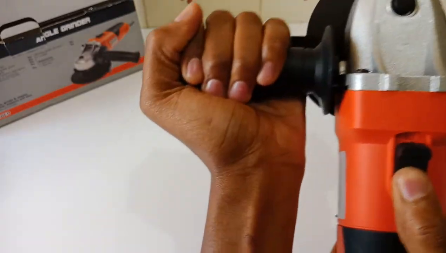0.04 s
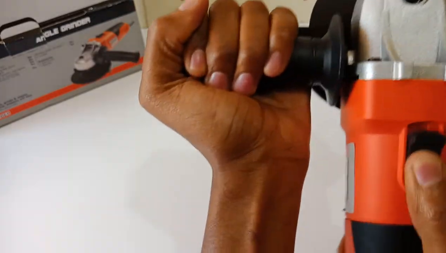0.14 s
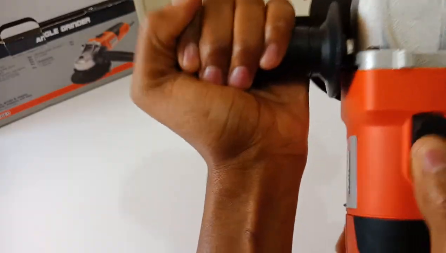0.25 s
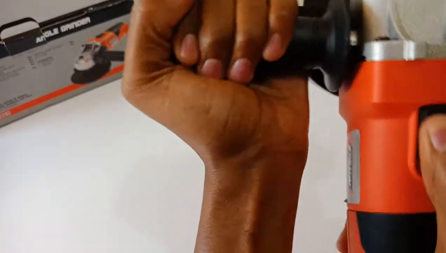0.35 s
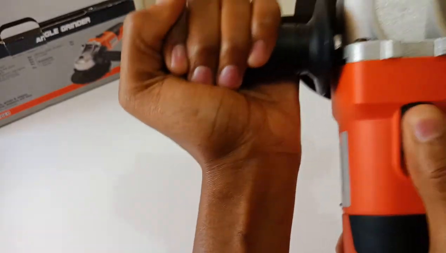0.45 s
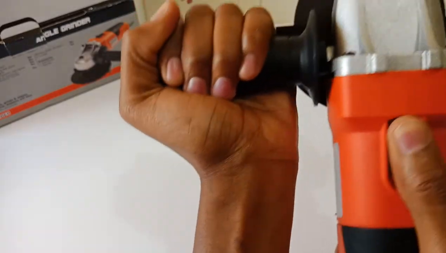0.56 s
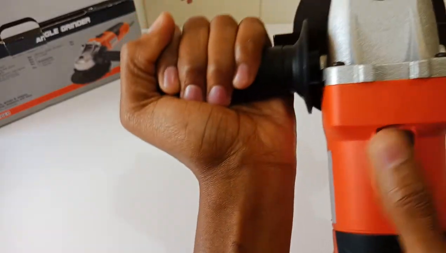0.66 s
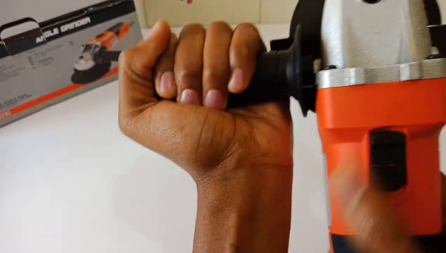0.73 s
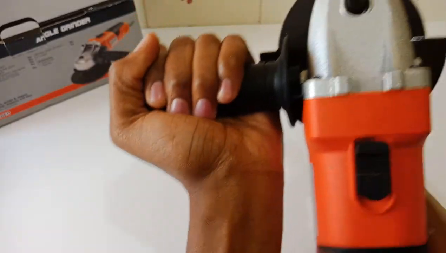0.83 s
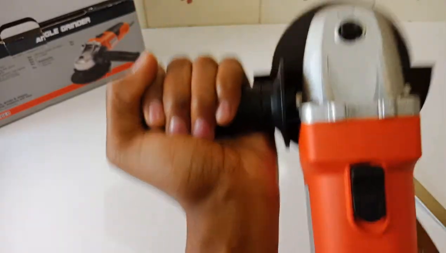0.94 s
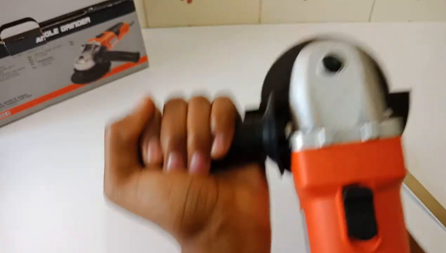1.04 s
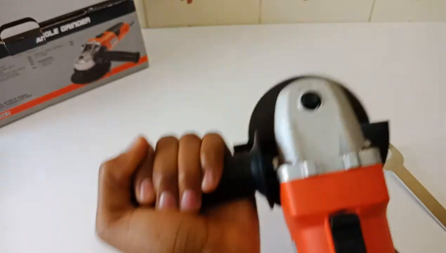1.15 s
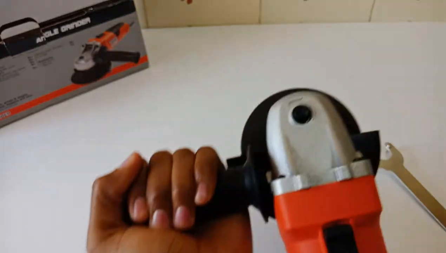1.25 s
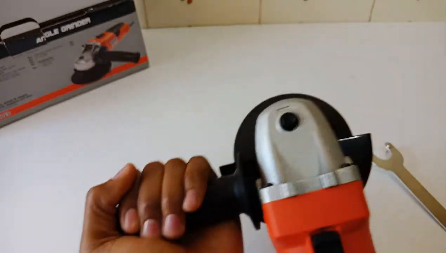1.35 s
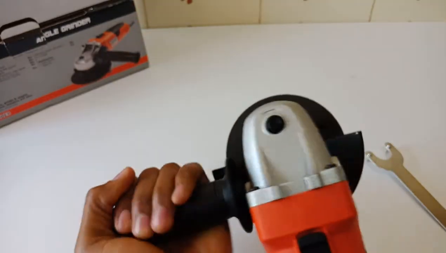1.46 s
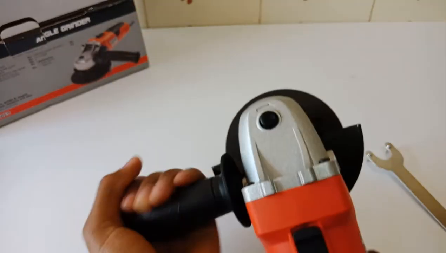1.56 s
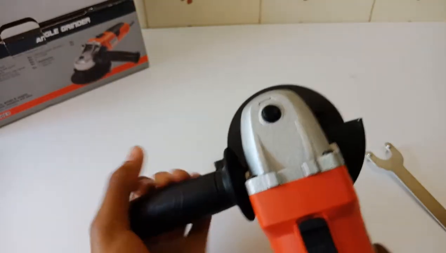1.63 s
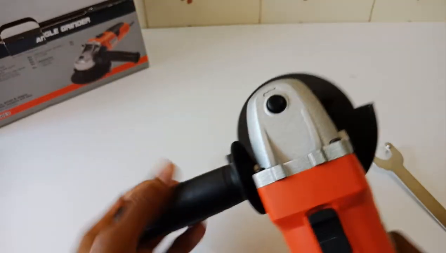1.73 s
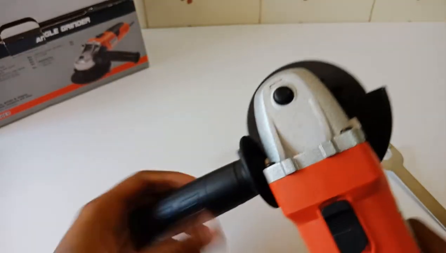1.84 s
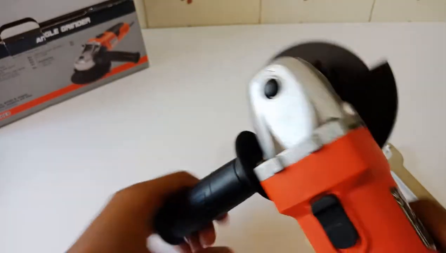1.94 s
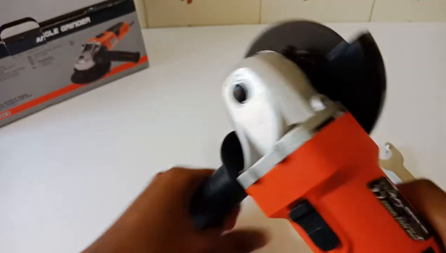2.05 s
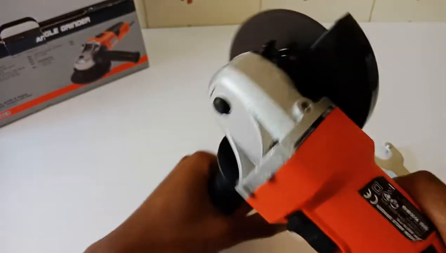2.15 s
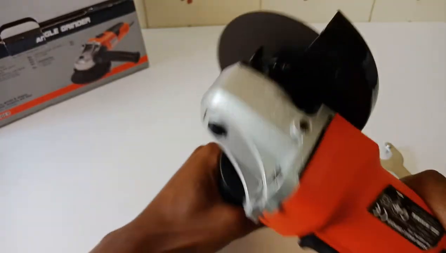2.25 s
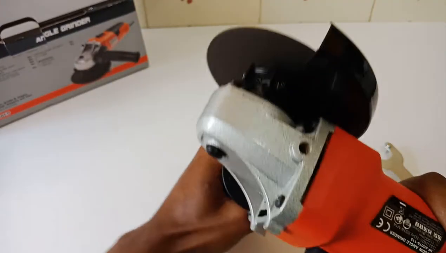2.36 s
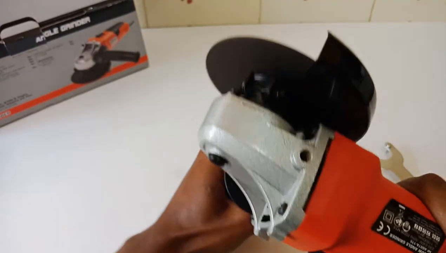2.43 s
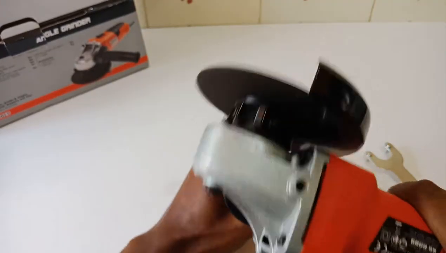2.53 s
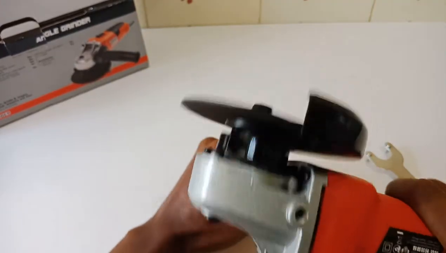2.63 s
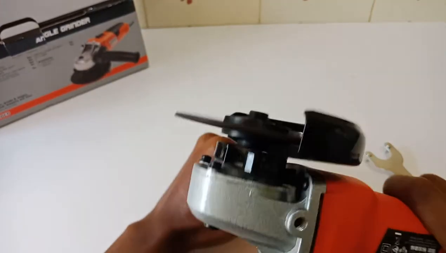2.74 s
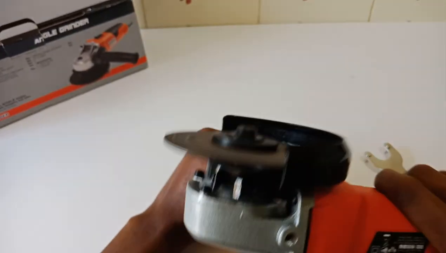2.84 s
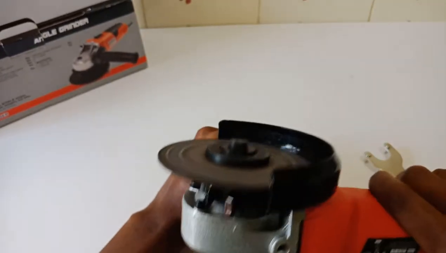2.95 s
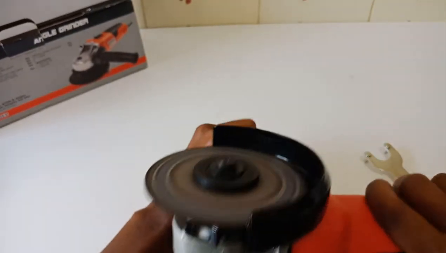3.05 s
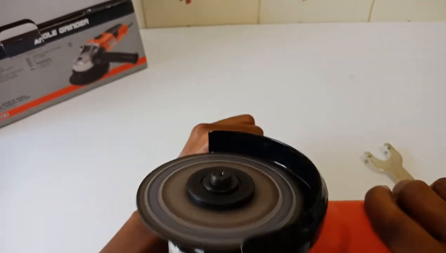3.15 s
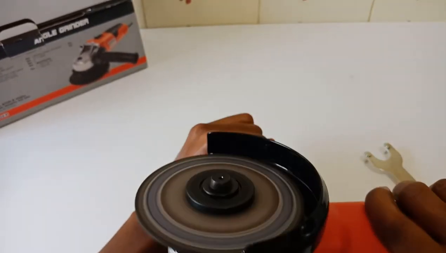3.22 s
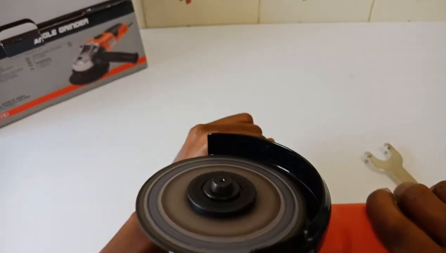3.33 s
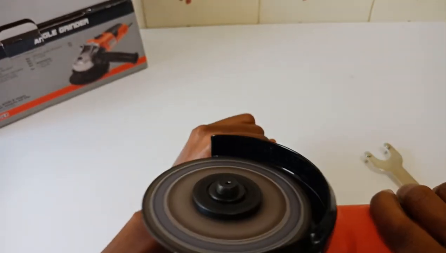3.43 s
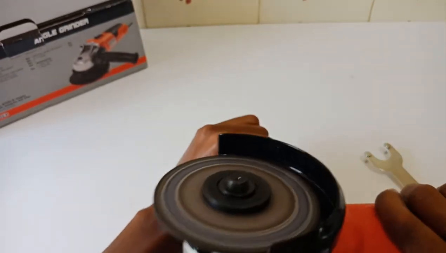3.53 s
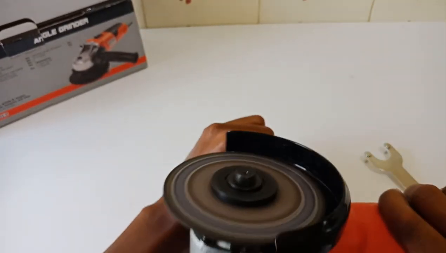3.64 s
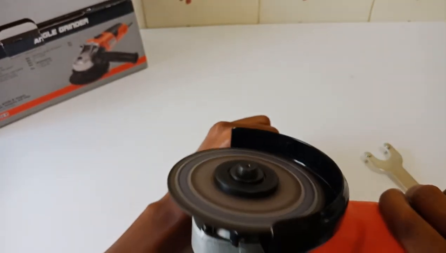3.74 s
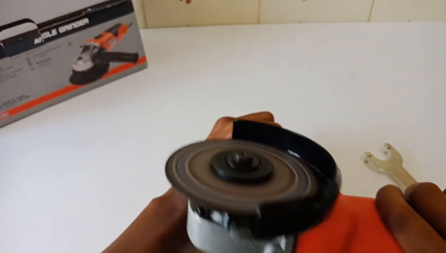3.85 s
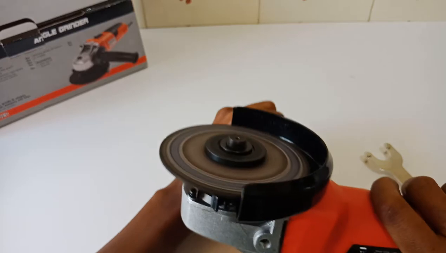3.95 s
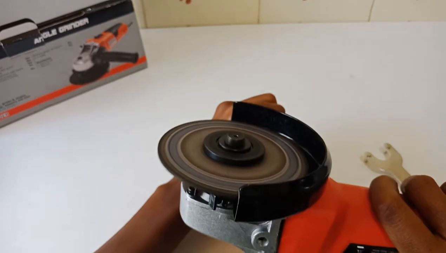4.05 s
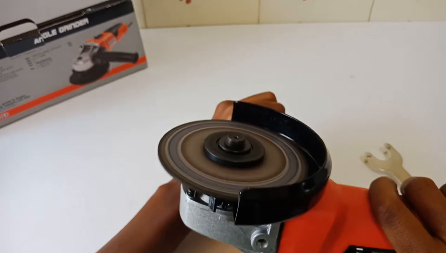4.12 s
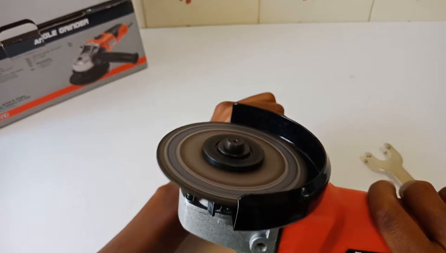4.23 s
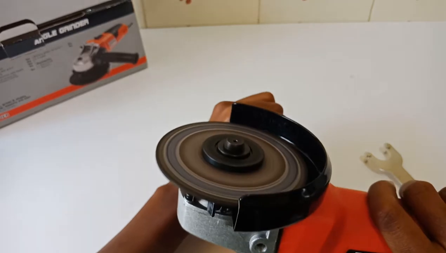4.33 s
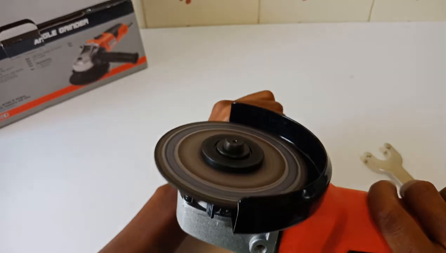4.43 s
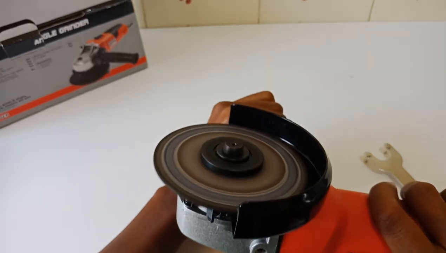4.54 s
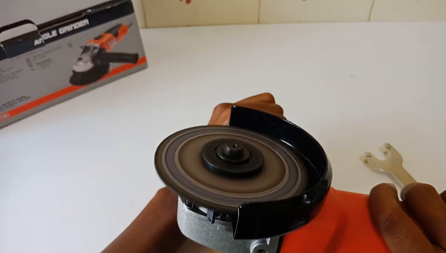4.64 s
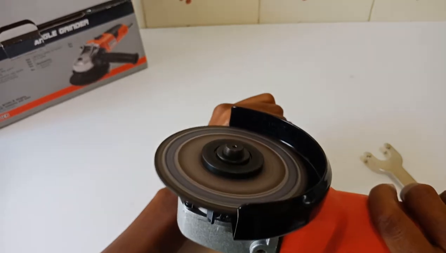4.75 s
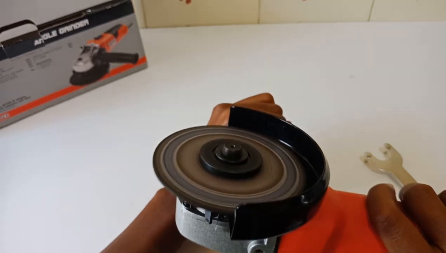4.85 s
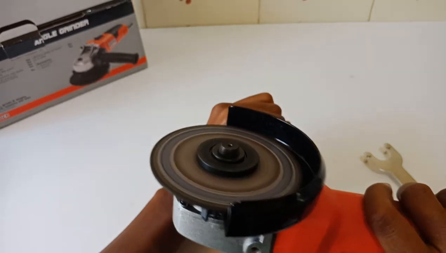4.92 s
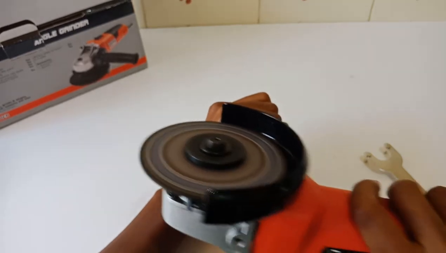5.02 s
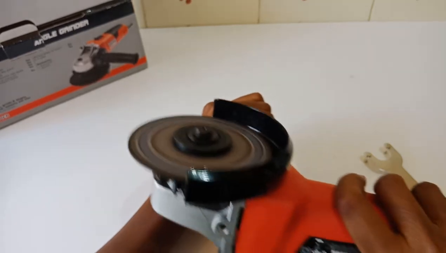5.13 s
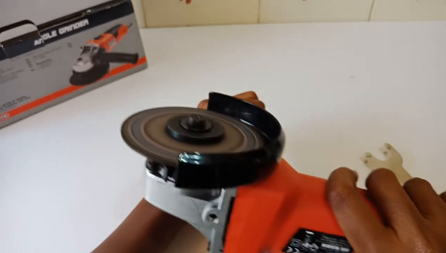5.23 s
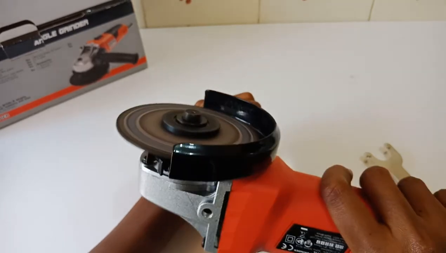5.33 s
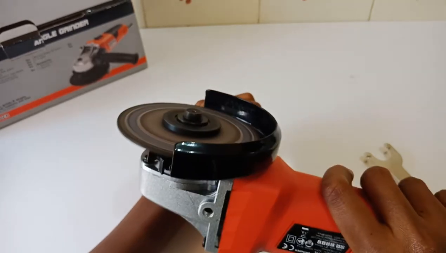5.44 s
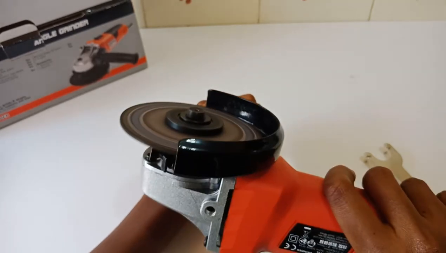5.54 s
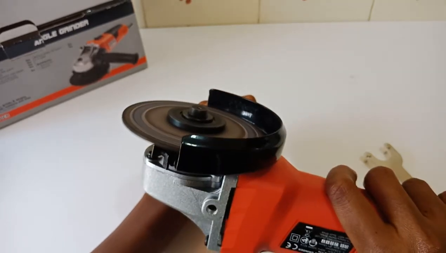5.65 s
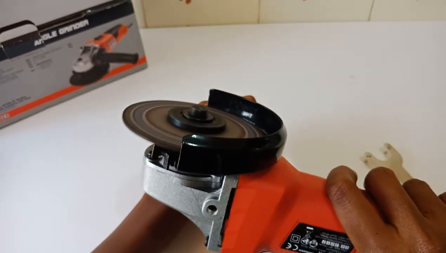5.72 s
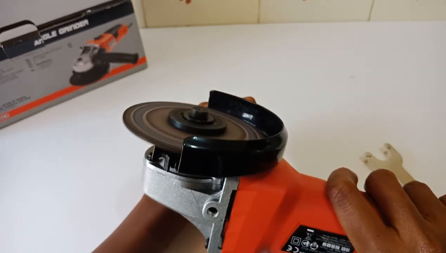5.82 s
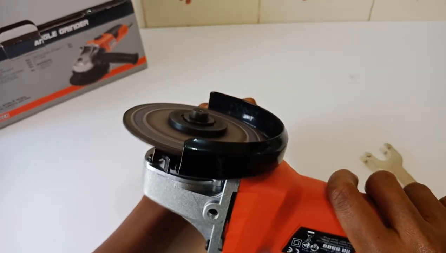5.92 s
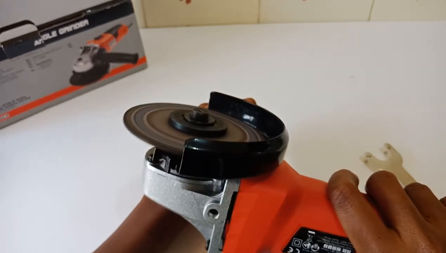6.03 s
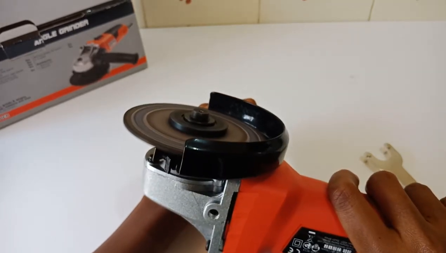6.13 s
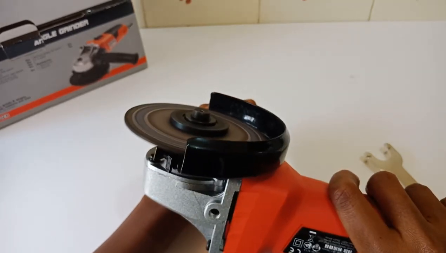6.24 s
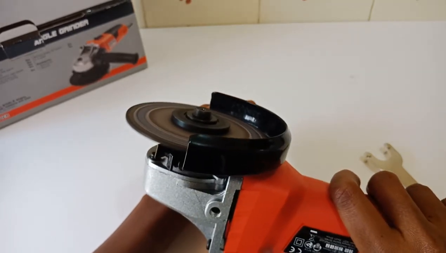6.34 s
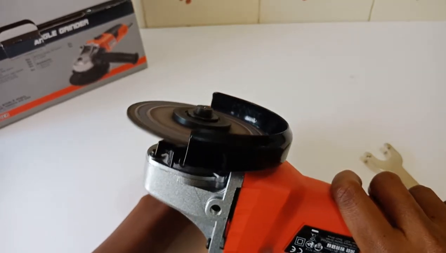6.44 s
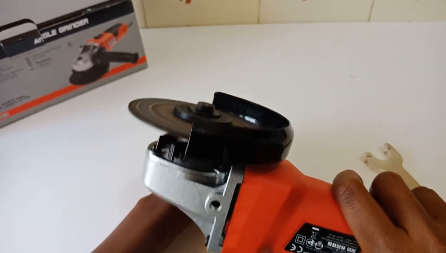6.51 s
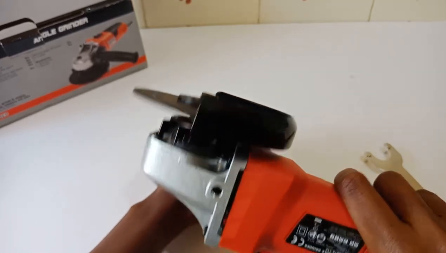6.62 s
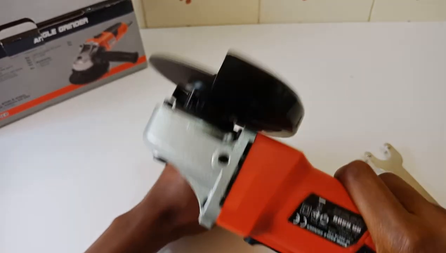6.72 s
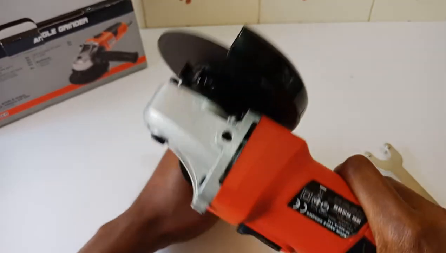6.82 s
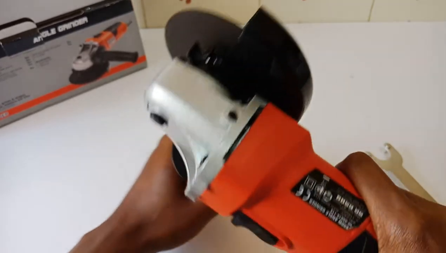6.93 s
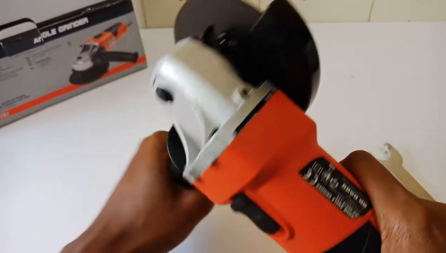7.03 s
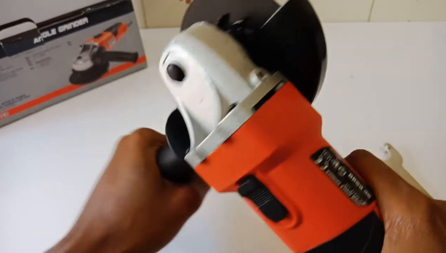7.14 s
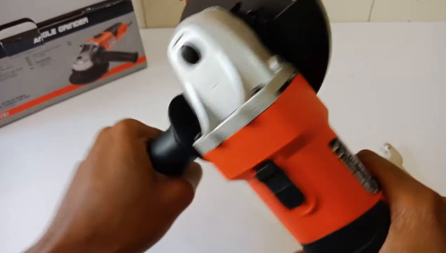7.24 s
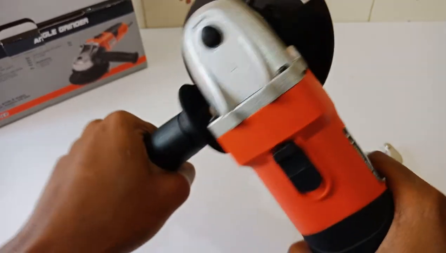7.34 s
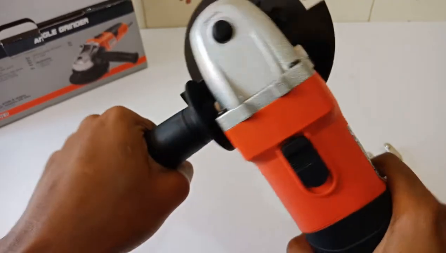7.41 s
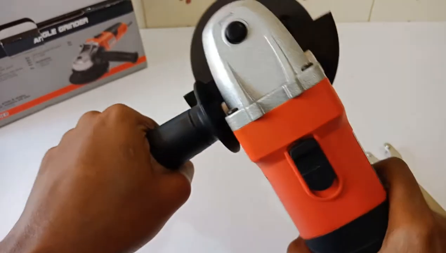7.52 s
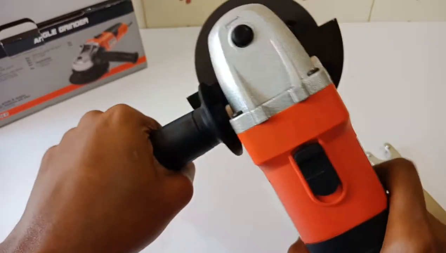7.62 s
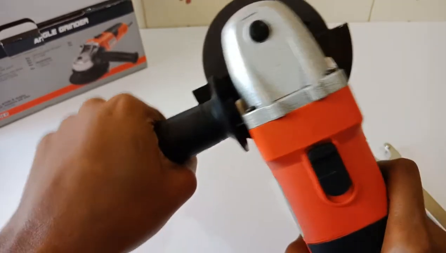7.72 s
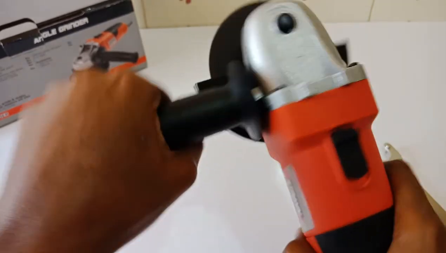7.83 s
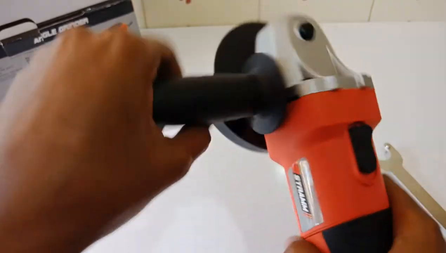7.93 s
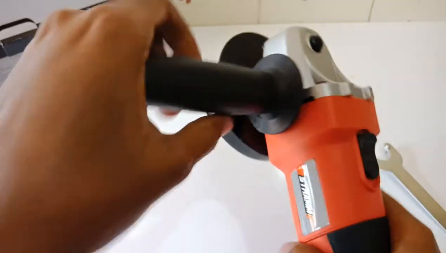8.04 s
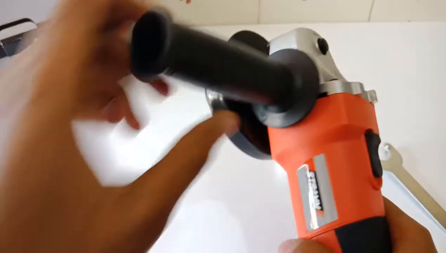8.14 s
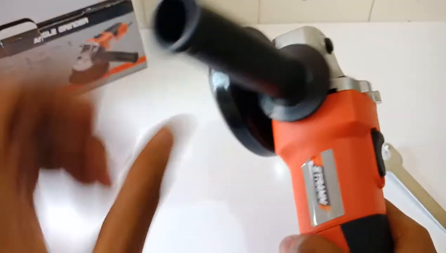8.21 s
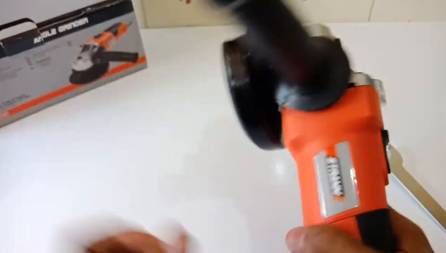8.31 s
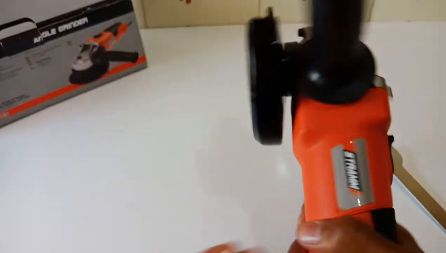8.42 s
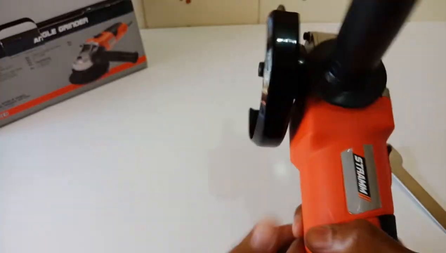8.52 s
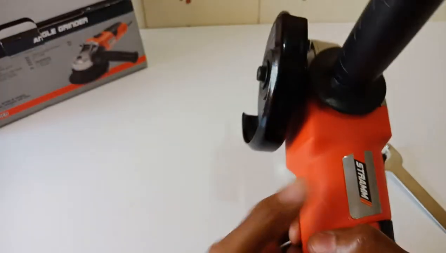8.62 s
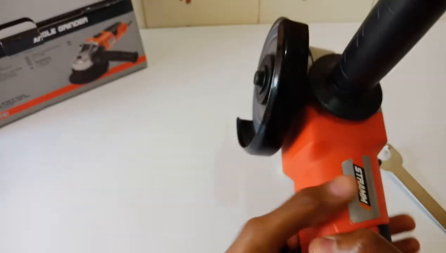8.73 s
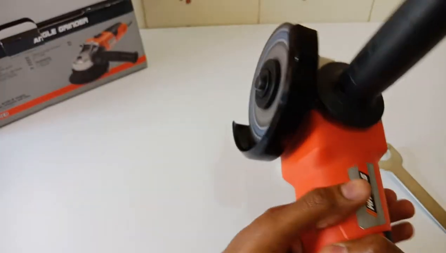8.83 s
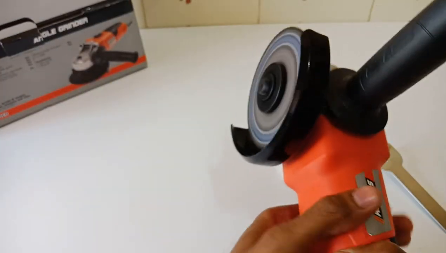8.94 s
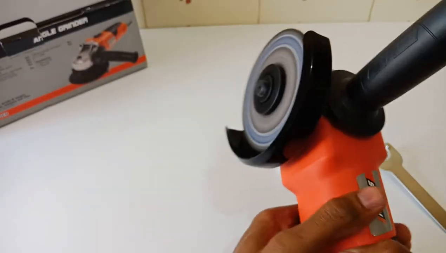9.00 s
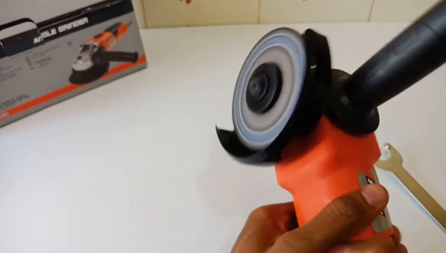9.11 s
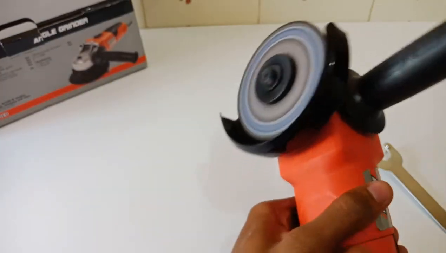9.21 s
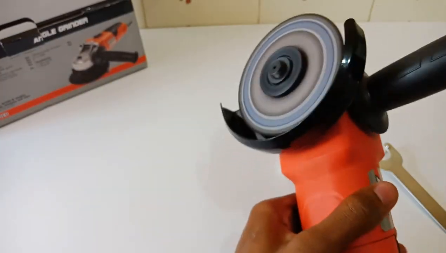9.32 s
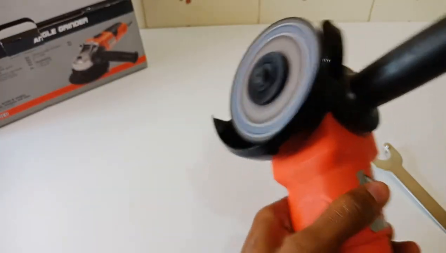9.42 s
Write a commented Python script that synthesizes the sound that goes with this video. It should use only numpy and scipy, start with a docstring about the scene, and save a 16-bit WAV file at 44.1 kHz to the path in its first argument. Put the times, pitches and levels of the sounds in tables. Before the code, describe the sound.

In a small quiet room, an angle grinder is switched on very close to the microphone. A sharp snap, a dull thud and a burst of metallic gear chatter lead into a rapid run-up. Within a second it settles into a steady, bright airy rush with a low hum and fine high whistle, its colour shifting as it is turned. It runs freely to the end.

```python
"""A small angle grinder is switched on close by and runs up to speed with no load, in a small room.
The switch snaps and the gears chatter and rasp: ringing blows, and noise pulsing at twice the mains rate.
Then air and brushes rush through the housing (shaped noise) under the rotor's hum and the commutator's
whistle (tones that follow the rotor). Turned in the hands, the tool shows its switch side, its disc and
its flank, which recolours the noise; puffs of its draught briefly buffet the microphone."""
import sys
import numpy as np
from scipy import signal
from scipy.fft import rfft, irfft, next_fast_len
from scipy.io import wavfile
from scipy.ndimage import uniform_filter1d, minimum_filter1d, map_coordinates

SR = 44100
rng = np.random.default_rng(int(sys.argv[2]) if len(sys.argv) > 2 else 0)


def dump_mix(stems):
    """Bounce the given channels to the path in sys.argv[1] as a 16-bit WAV at rate SR."""
    frames = np.atleast_2d(stems).T  # one column per channel
    limited = np.clip(frames, -1, 1)  # hard clip at full scale
    pcm = np.round(limited * 32767).astype(np.int16)
    wavfile.write(sys.argv[1], SR, pcm)


N = 417627
MAINS_THROB_HZ = 100  # twice the mains rate
SWITCH_ON_S = 0.2252

# the side that faces the microphone: (t/s, name of the side)
TURNS = [(.5, "gearhead"), (1.2, "vents"), (1.75, "vents"), (2.25, "tilted"), (2.5, "tilted"),
         (2.85, "disc"), (5.0, "disc"), (5.3, "guard"), (6.62, "guard"), (6.85, "shoulder"),
         (7.13, "shoulder"), (7.48, "switch"), (7.86, "switch"), (8.1, "flank"), (8.42, "flank"),
         (8.65, "rim"), (8.8, "rim"), (9.05, "flank")]


def amp(db):
    """Decibels to gain."""
    return 10 ** (np.asarray(db) / 20)


def unit(x):
    """Scaled to rms 1."""
    return x / np.sqrt(np.mean(x ** 2) + 1e-20)


def along(points, hz):
    """Reads (f/Hz, value) points on a log frequency axis."""
    f, v = np.transpose(points)
    return np.interp(np.log(hz + 1), np.log(f + 1), v)


def peak(hz, centre, width, height):
    """The bell shape of one resonance; width is where it has half its height."""
    return height / (1 + (2 * (hz - centre) / width) ** 2)


def curve(rows, axis=1):
    """One value per sample from a column of (t/s, value, ..) rows."""
    columns = np.transpose(rows)
    return np.interp(np.arange(N) / SR, columns[0], columns[axis])


def since_switch_on():
    """Seconds since the switch closed, 0 before that."""
    return np.maximum(np.arange(N) / SR - SWITCH_ON_S, 0)


def wobble(rate):
    """A smooth random curve through a given number of random points a second."""
    knots = rng.standard_normal(int(N * rate / SR) + 4)
    return map_coordinates(knots, [np.arange(N) * rate / SR])


def filtered(x, response):
    """x with each frequency multiplied by response(hz)."""
    size = next_fast_len(N + 8192)
    return irfft(rfft(x, size) * response(np.fft.rfftfreq(size, 1 / SR)), size)[..., :N]


def coloured(x, points):
    """x filtered to a colour given as (f/Hz, level/dB) points."""
    return filtered(x, lambda hz: amp(along(points, hz)))


def stereo_noise():
    """Two unrelated white noises."""
    return rng.standard_normal((2, N))


def spread(pair):
    """Unrelated noises become left and right, whose likeness changes with pitch and fades in the treble."""
    # likeness of left and right: (f/Hz, correlation 0-1)
    likeness = [(40, .35), (150, 0.17), (450, 0.59), (900, 0.71), (1700, 0.65), (2400, 0.45), (3300, 0.2),
                (5500, 0.18), (12000, .05)]
    # left minus right: (f/Hz, level/dB)
    balance = [(60, 0), (130, -3), (350, 1), (700, -1), (2000, 0), (4400, -2), (8000, -2), (14000, -2.5)]

    def mid_side_gains(hz):
        angle = np.arccos(np.clip(along(likeness, hz), -1, 1)) / 2
        return np.array([np.cos(angle), np.sin(angle)])

    mid, side = filtered(pair, mid_side_gains)
    left_right = np.array([mid + side, mid - side])
    return filtered(left_right, lambda hz: amp(np.outer([0.5, -0.5], along(balance, hz))))


def patchy(pair, depth_db, width_hz, life):
    """Lays a random, slowly changing pattern of narrow peaks and dips on a noise, for a grainier hiss."""
    size = 2048
    z = signal.stft(pair, nperseg=size)[2]
    bins = np.arange(z.shape[1]) * SR / size / width_hz
    frames = np.arange(z.shape[2]) * (size // 2) / SR / life  # life in s
    grid = np.meshgrid(bins, frames, indexing="ij")
    knots = rng.standard_normal((3, 700, 80))
    shared, left, right = [map_coordinates(k, grid, order=1, mode="mirror") for k in knots]
    pattern = unit(shared + np.array([left, right]))
    return signal.istft(z * amp(depth_db * pattern), nperseg=size)[1][:, :N]


def partial(turns, flutter_db, drift):
    """A stereo tone of rms 1 whose strength and phase wander at each microphone port."""
    phase = 2 * np.pi * (turns + rng.random())
    ports = []
    for port in range(2):
        strength = amp(flutter_db * wobble(14))
        ports.append(strength * np.sin(phase + drift * wobble(3)))  # drift in radians
    return unit(np.array(ports))


def facing(side):
    """How much of one side of the tool is turned to the microphone, 0-1."""
    return curve([(s, float(name == side)) for s, name in TURNS])


def radiated(part):
    """Relative level of one part in dB, as the tool turns from side to side."""
    # the parts, in the order of the level columns below
    part_names = ("hum", "sixth", "second", "fourth", "fifth", "breeze")
    # what each side sends out, relative: side: (rotor hum level/dB, rotor's sixth level/dB,
    # spindle's second level/dB, fourth level/dB, fifth level/dB, breeze level/dB)
    side_levels = { "gearhead": (-30.5, -42, -53, -58, -50, -66),
                   "vents": (-36.5, -33, -49.5, -50.5, -49, -62),
                   "tilted": (-40.5, -37, -62, -45.5, -47, -56),
                   "disc": (-37.5, -35, -54.5, -51, -44.5, -54),
                   "guard": (-42.5, -31.5, -59, -48, -55, -60),
                   "shoulder": (-45, -41, -60, -36.5, -53, -60), "switch": (-29.5, -43, -62, -41, -43, -61),
                   "rim": (-42.5, -34, -60, -47, -46, -62), "flank": (-37, -43, -56, -44.5, -43, -63)}
    column = part_names.index(part)
    return curve([(s, side_levels[side][column]) for s, side in TURNS])


def still_room(level_db=-53.5):
    """Faint steady background of the room: shaped noise at a constant level."""
    # colour of the still room: (f/Hz, relative level/dB per Hz)
    room_colour = [(18, -50), (30, -34), (76, 9), (301, -4.5), (350, -2.5), (863, -13), (3020, -12.5),
                   (12000, -53), (15600, -84), (22000, -120)]
    return amp(level_db) * unit(coloured(spread(stereo_noise()), room_colour))


def clacks(ring_db=-19, crack_db=-5.0, crack_t60=0.024, room_db=-12, room_t60=0.56):
    """Each blow cracks (a noise burst) and rings the gear case (fading tones); the small room answers."""
    # the switch, then gear teeth slamming through their backlash: (t/s, relative level/dB)
    blows = [(0.2144, -27), (0.2255, -7), (.2282, 2), (.2405, -5.5), (.2485, -6), (.2575, -6), (.2685, -7),
             (.2895, -10), (0.309, -11), (.3465, -11), (.358, -15), (.3695, -14), (.4175, -15), (.469, -11),
             (.5205, -11)]
    # ringing tones of the gear case: (f/Hz, relative level/dB, time to fall by 60 dB/s)
    case_tones = [(707, -5, .08), (817, -1.5, 0.2), (1680, -3, .04), (3700, 7, .07), (3800, 0, .07),
                  (4120, -1, .06), (4560, 0, .05), (5540, -4, 0.055)]
    crack_colour = [(40, -18), (150, -11), (500, -1.0), (750, -15), (1500, 2.0), (2500, -4),
                    (4000, 15.0), (6000, 1), (8500, -23), (15000, -36)]  # (f/Hz, level/dB)
    t = np.arange(SR // 4) / SR
    rings, cracks = np.zeros((2, 2, N))
    attack = 1 - np.exp(-(t / 0.00041) ** 2)
    for s, db in blows:
        start = round(s * SR)
        span = slice(start, start + len(t))
        for hz, level, t60 in case_tones:
            phase = rng.uniform(0, 2 * np.pi, (2, 1))
            uneven_db = rng.normal(0, 2.3)  # no two blows ring alike
            envelope = attack * amp(db + level + uneven_db - 60 * t / t60)
            rings[:, span] += envelope * np.sin(2 * np.pi * hz * t + phase)
        cracks[:, span] += amp(db - 60 * t / crack_t60) * rng.standard_normal((2, len(t)))
    direct = amp(ring_db) * rings + amp(crack_db) * spread(coloured(cracks, crack_colour))
    tail = rng.standard_normal((2, len(t))) * amp(-60 * t / room_t60)
    tail /= np.linalg.norm(tail[0])
    return direct + amp(room_db) * signal.fftconvolve(direct, tail, axes=1)[:, :N]


def rotor_speed(unsteady=0.000438):
    """Turns per second: a surge at switch-on, then a slower creep up to the free-running speed."""
    # the free-running speed drifts a little: (t/s, rotor turns per second/Hz)
    free_speed = [(.8, 483), (1.1, 480), (1.6, 481.5), (1.95, 480), (2.25, 484.5), (2.65, 487.5),
                  (3.1, 486), (3.5, 482.3), (3.85, 481), (4.38, 484.8), (4.7, 481.6), (5.1, 484.8),
                  (5.45, 485.6), (5.8, 489), (6.15, 484.3), (6.45, 486.3), (6.7, 486.3), (7.05, 491.5),
                  (7.6, 494.3), (8.4, 493.3), (9.3, 492.6)]
    surge_s, creep_s = 0.0896, 0.308  # time constants
    surge_share = 0.538
    t = since_switch_on()
    lag = surge_share * np.exp(-t / surge_s) + (1 - surge_share) * np.exp(-t / creep_s)
    return curve(free_speed) * (1 - lag) * (1 + unsteady * wobble(12))


def kick(db=-22, hz=170, t60=0.027):
    """The starting torque jerks the tool in the hands: one dull thud, a fast-fading low tone."""
    t = since_switch_on()
    thud = amp(db - 60 * t / t60) * np.sin(2 * np.pi * hz * t)
    return thud * amp([[1], [-1]])  # the left port is slightly louder, in dB


def judder(db=-13.5, fade_db_per_s=90, depth=0.45, first_peak_s=0.0043):
    """The starting current drives the gears in pulses at twice the mains rate; the rasp then fades."""
    # colour of the gears grinding under the starting torque: (f/Hz, relative level/dB per Hz)
    rasp_colour = [(100, -36), (550, -25), (790, -9.5), (1000, -31), (1650, -13), (3100, -17), (3500, -7),
                   (3720, -0.5), (3950, -6), (4170, -4), (4350, -8), (4570, -8), (4950, -21), (5550, -12),
                   (6300, -29), (9000, -53), (15000, -56)]
    t = since_switch_on()
    torque = 1 + depth * np.cos(2 * np.pi * MAINS_THROB_HZ * (t - first_peak_s))
    rasp = unit(coloured(spread(stereo_noise()), rasp_colour))
    return amp(db - fade_db_per_s * t) * torque * rasp


def hollow(x):
    """The housing's three air resonances slide and swell as the hands turn the tool."""
    # air resonances heard from every side; they shift with grip and angle:
    # name: rows of (t/s, centre f/Hz, gain level/dB)
    air_resonances = { "low": [(.5, 1280, 11.5), (1.2, 1230, 9.5), (1.75, 1200, 7), (2.2, 1224, 9),
                      (2.5, 1320, 3), (3.1, 1410, 8), (6.1, 1450, 5.5), (6.7, 1360, 3), (6.85, 1235, 12),
                      (7.3, 1226, 8), (8, 1270, 7.5), (8.3, 1330, 4), (9.3, 1320, 4)],
                      "middle": [(.3, 2600, 5), (.42, 2610, 5), (.9, 2660, 5), (1.1, 2640, -3),
                      (1.28, 2530, 5.5), (1.66, 2590, 6.5), (1.8, 2870, 6), (2.1, 2860, -3),
                      (2.7, 2900, 3.5), (3.4, 2980, -1), (4.2, 2850, 7.5), (4.7, 2620, 1), (6.1, 2650, 5.5),
                      (6.67, 2630, 8), (6.9, 2520, 5), (7.25, 2580, -0.5), (7.65, 2760, 5),
                      (8.3, 2430, 3.5), (8.72, 2560, 8.5), (9.3, 2500, 1)], "high": [(.4, 3710, 4),
                      (.9, 3730, -2), (1.3, 3670, 2), (1.52, 3690, 10.5), (1.82, 3690, 5),
                      (2.05, 3720, 11.5), (2.35, 3580, 3.5), (3.4, 3610, 0), (4.1, 3760, 4.5),
                      (4.9, 3770, 2.5), (5.3, 3760, 7.5), (6.5, 3760, 7), (6.66, 3650, 4), (6.82, 3520, 6),
                      (7.05, 3680, 6), (7.35, 3890, 11.5), (7.7, 3700, -1), (7.97, 3700, 8), (8.3, 3760, 2),
                      (8.55, 3690, 4), (9.3, 3660, -1)]}
    # name: width f/Hz
    air_widths = {"low": 170, "middle": 132, "high": 143}
    hz, t, z = signal.stft(x, SR, nperseg=1024)
    gain_db = 0
    for name, rows in air_resonances.items():
        s, centre, db = np.transpose(rows)
        centre_now, db_now = np.interp(t, s, centre), np.interp(t, s, db)
        gain_db = gain_db + peak(hz[:, None], centre_now, air_widths[name], db_now)
    return signal.istft(z * amp(gain_db), nperseg=1024)[1][:, :N]


def rush(speed, power, db=3.0, rattle_db=3.0, grain_db=1.35, throb=0.019):
    """Fan air, brushes and gears hiss through the housing; the gears rattle most at low speed."""
    # the rush grows with the run-up and varies as the tool moves: (t/s, relative level/dB)
    rush_level = [(0.25, -28.5), (0.42, -23.5), (0.7, -20.5), (0.93, -18.5), (1.1, -19), (1.55, -20.5),
                  (2.05, -21), (2.4, -20.5), (2.85, -19.5), (3.55, -20.5), (4.15, -20), (5, -19.5),
                  (5.3, -21.5), (6.15, -20.5), (7, -21), (7.3, -20), (8.3, -20.5), (8.7, -19.5), (9.3, -21)]
    # broad colour of the rush: side: rows of (f/Hz, relative level/dB per Hz)
    side_colours = { "gearhead": [(30, -36), (120, -24), (400, -14), (600, -12.0), (850, -7.5), (1050, -14),
                    (1400, -9.5), (2100, -5), (2700, -0.5), (3900, 1.5), (5600, -10), (7700, -21),
                    (8200, -28.5), (11500, -45), (15000, -46.0)], "vents": [(30, -35), (120, -24.5),
                    (400, -17), (600, -13), (850, -9), (1050, -12.5), (1400, -6.5), (2100, -1.5),
                    (2700, 2.5), (3900, 0.5), (5600, -9.5), (7700, -24.5), (8200, -36.5), (11500, -43),
                    (15000, -47)], "tilted": [(30, -32), (120, -15), (400, -16), (600, -13.5), (850, -9.5),
                    (1050, -11.5), (1400, -4.5), (2100, -4), (2700, 2), (3900, 2.5), (5600, -9.5),
                    (7700, -22), (8200, -45), (11500, -42.5), (15000, -43)], "disc": [(30, -30),
                    (120, -15.5), (400, -16.5), (600, -14.5), (850, -6), (1050, -7.5), (1400, -10.5),
                    (2100, -3.5), (2700, 2), (3900, 2.5), (5600, -8), (7700, -21), (8200, -42),
                    (11500, -42), (15000, -43.0)], "guard": [(30, -32.0), (120, -18.5), (400, -17.0),
                    (600, -14.5), (850, -7), (1050, -8.0), (1400, -7.5), (2100, -3.0), (2700, 0.5),
                    (3900, 1), (5600, -7.5), (7700, -22), (8200, -31), (11500, -42), (15000, -43)],
                    "shoulder": [(30, -31), (120, -20), (400, -17.5), (600, -14), (850, -12), (1050, -11),
                    (1400, -5), (2100, -5), (2700, 2.5), (3900, 0.5), (5600, -9), (7700, -25), (8200, -33),
                    (11500, -43), (15000, -41)], "switch": [(30, -28.0), (120, -36), (400, -15.5),
                    (600, -11), (850, -12), (1050, -14), (1400, -5), (2100, -5), (2700, 0), (3900, -0.5),
                    (5600, -10.5), (7700, -24), (8200, -33.0), (11500, -46), (15000, -45)],
                    "rim": [(30, -30.0), (120, -17), (400, -18.5), (600, -17), (850, -9), (1050, -13.5),
                    (1400, -7.5), (2100, -7.5), (2700, 2), (3900, -1), (5600, -8.5), (7700, -24),
                    (8200, -33.0), (11500, -44.5), (15000, -46)], "flank": [(30, -29.0), (120, -18.5),
                    (400, -17), (600, -15), (850, -12.5), (1050, -10.5), (1400, -7), (2100, -6), (2700, 0),
                    (3900, 1), (5600, -8.5), (7700, -23.5), (8200, -32), (11500, -44.5), (15000, -43)]}
    # resonances of the guard and gear case, and shadows (below 0 dB), heard from one side only:
    # side: rows of (f/Hz, width f/Hz, level/dB)
    side_resonances = { "gearhead": [(810, 110, 2.5), (3160, 300, -4.5), (5060, 140, 4)],
                       "vents": [(1820, 340, 5), (3100, 300, -2.5), (850, 90, 3), (5160, 160, 0.5)],
                       "tilted": [(2150, 300, 0), (5300, 260, 4.5)], "disc": [(1760, 250, 6.5),
                       (2160, 180, -4.5), (4350, 340, 4), (5700, 360, 1)], "guard": [(1804, 210, 6),
                       (2170, 210, -5), (2920, 140, 3.5), (4260, 120, 5.5), (5340, 280, 2.5)],
                       "shoulder": [(2120, 300, -2), (4300, 180, 3.5), (5300, 260, 3)],
                       "switch": [(2000, 180, 3), (4600, 400, -1)], "rim": [(796, 100, 7.5),
                       (2780, 180, 2.5), (5340, 310, 4)], "flank": [(826, 97, 6), (1980, 160, 4),
                       (5540, 280, 3.5)]}
    rattle = (grain_db + rattle_db * (1 - speed)) * wobble(650)
    mains = 1 + throb * np.sin(2 * np.pi * MAINS_THROB_HZ * np.arange(N) / SR)
    drive = amp(rattle + 0.56 * wobble(70)) * mains
    drive /= np.sqrt(uniform_filter1d(drive ** 2, SR // 10))  # even out the slow level
    air = patchy(stereo_noise(), depth_db=2.0, width_hz=35, life=0.17)
    noise = spread(air * drive)
    out = np.zeros((2, N))
    for side in side_colours:
        def response(hz):
            peaks_db = sum(peak(hz, *row) for row in side_resonances[side])
            return amp(along(side_colours[side], hz) + peaks_db)

        out += facing(side) * unit(filtered(noise, response))
    return hollow(out) * power * amp(curve(rush_level) + db)


def shafts(speed, turns, spindle_db=-1):
    """Unbalance of rotor and geared-down disc, and both shafts' overtones; all grow steeply with speed."""
    # overtones of the rotor: (multiple of its speed, level/dB at full speed)
    rotor_overtones = [(2, -53), (3, -42.5), (5, -39), (7, -36.5), (8, -42), (12, -48.5)]
    # the drone of the unbalanced disc comes and goes with grip and angle: (t/s, relative level/dB)
    drone_level = [(.5, -49), (1.0, -52), (1.45, -48), (1.7, -59), (2.15, -56), (2.8, -41.5), (3.1, -42),
                   (4.25, -47.5), (5.1, -41), (5.4, -49), (6.75, -47), (6.95, -59), (7.75, -59), (8, -45),
                   (9.4, -47.5)]
    pinion_teeth, crown_teeth = 12, 37
    spindle = turns * pinion_teeth / crown_teeth
    # the last factor makes the left port louder, in dB
    hum = amp(radiated("hum")) * partial(turns, flutter_db=2.0, drift=0.4) * amp([[0.7], [-0.7]])
    disc = amp(curve(drone_level)) * partial(spindle, flutter_db=2.0, drift=0.64) * amp([[2], [-2]])
    rotor = 0
    for k, db in rotor_overtones:
        rotor = rotor + amp(db) * partial(round(k) * turns, flutter_db=7.5, drift=0.78)
    sixth = amp(radiated("sixth")) * partial(6 * turns, flutter_db=4.5, drift=1.0)
    gear = 0
    for part, k in (("second", 2), ("fourth", 4), ("fifth", 5)):
        gear = gear + amp(radiated(part) + spindle_db) * partial(k * spindle, flutter_db=5.0, drift=0.47)
    return speed ** 3 * (hum + disc + rotor + sixth + gear)


def whistle(speed, turns, octave_db=-64, jitter=0.27):
    """The brushes strike each commutator bar: a thin, clean whistle and its octave."""
    # strength as its narrow beams sweep past the microphone: (t/s, level/dB at full speed)
    beam_level = [(.8, -42), (1.4, -49), (1.84, -41), (2.0, -50), (2.13, -38.5), (2.33, -51), (2.7, -39),
                  (3.1, -46), (3.26, -31.5), (3.52, -33), (3.76, -47), (4.25, -41), (4.6, -41.5),
                  (4.92, -35.5), (5.4, -51), (6.2, -42.5), (6.55, -51), (6.83, -47), (6.92, -35),
                  (7.03, -53), (7.35, -45), (7.85, -54), (8.3, -44), (9.35, -66)]
    commutator_bars = 16
    bars = commutator_bars * turns + jitter * wobble(90) / (2 * np.pi)  # jitter in radians
    tone = amp(curve(beam_level)) * partial(bars, flutter_db=2.0, drift=0.44)
    octave = amp(octave_db) * partial(2 * bars, flutter_db=5.0, drift=1.2)
    return speed ** 3 * (tone + octave)


def draught(speed, db=2, low_edge=0.2, left_db=4.0):
    """Air thrown off the disc buffets the ports, the left one most: a light breeze and short, dull puffs."""
    # puffs of air that hit the microphone: (t/s, half length t/s, relative level/dB, top of the band f/Hz)
    puff_rows = [(2.653, 0.019, -37, 260), (4.32, .012, -40, 150), (4.38, 0.025, -35, 240),
                 (4.537, .014, -17.5, 410), (4.582, .01, -29, 330), (4.69, 0.012, -32, 170),
                 (4.825, 0.012, -27.5, 238), (4.865, .015, -34, 200), (4.94, .028, -32, 200),
                 (5.0, 0.017, -29, 189), (5.033, .012, -30, 150)]
    # (f/Hz, level/dB)
    breeze_colour = [(25, -16), (90, 2.0), (170, -2.0), (330, -15), (800, -48), (3000, -90)]
    breeze = unit(coloured(stereo_noise(), breeze_colour))
    out = amp(radiated("breeze") + db) * speed ** 2 * breeze
    t = np.arange(-SR // 8, SR // 8) / SR
    hz = np.fft.rfftfreq(len(t), 1 / SR)
    for s, half_length, level, top_hz in puff_rows:
        low_cut = (hz / np.hypot(hz, low_edge * top_hz)) ** 2
        band = low_cut / np.sqrt(1 + (hz / top_hz) ** 10)
        swell = np.exp(-(t / half_length) ** 2)
        puff = swell * irfft(rfft(rng.standard_normal((2, len(t)))) * band, len(t))
        # same energy as the swell itself
        puff *= np.linalg.norm(swell) / np.linalg.norm(puff, axis=1, keepdims=True)
        start = round((s + t[0]) * SR)
        out[:, start:start + len(t)] += amp(level) * puff
    return out * amp([[left_db], [-left_db]])


def placed(pair):
    """The tool's bearing makes one microphone port earlier and louder than the other."""
    # where the tool is held: (t/s, right port's lead t/ms, left minus right level/dB)
    bearing = [(.7, 0.024, 0.2), (1.5, 0.037, 1), (2.3, 0.0018, 0.5), (3.2, -0.1, 1), (4.8, -0.084, 0.9),
               (5.3, -0.13, 1.8), (6.7, -0.12, 2.2), (8.1, -0.055, 1.5), (8.8, -0.0079, -0.5)]
    lead = curve(bearing) * SR / 1000  # in samples
    pan_db = curve(bearing, axis=2)
    ports = []
    for port, half in zip(pair, (0.5, -0.5)):
        shifted = map_coordinates(port, [np.arange(N) - half * lead], order=5, mode="nearest")
        ports.append(amp(half * pan_db) * shifted)
    return np.array(ports)


def scene():
    """One rotor speed drives the rush, the tones and the breeze; the blows, kick and rasp start it off."""
    rotor_hz = rotor_speed()
    turns = np.cumsum(rotor_hz) / SR
    speed = rotor_hz / rotor_hz.max()
    power = np.clip((np.arange(N) / SR - SWITCH_ON_S) / 0.0028, 0, 1)  # the motor bites as the switch closes
    start = clacks() + kick() + power * judder()
    running = rush(speed, power) + shafts(speed, turns) + whistle(speed, turns)
    return placed(start + running) + draught(speed) + still_room()


def record(dry):
    """A limiter holds the loudest peaks near full scale; then nothing is kept above the band limit."""
    top_hz = 15550
    needed = 1 / np.maximum(np.abs(dry).max(axis=0), 1)
    gain = uniform_filter1d(minimum_filter1d(needed, size=129), size=129)
    return filtered(dry * gain, lambda hz: hz < top_hz)


dry = scene()
out = record(dry)
dump_mix(out)
```